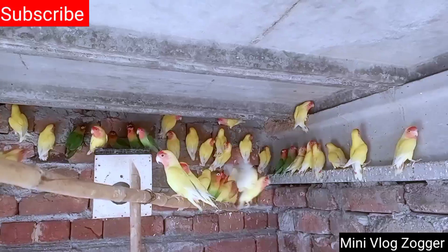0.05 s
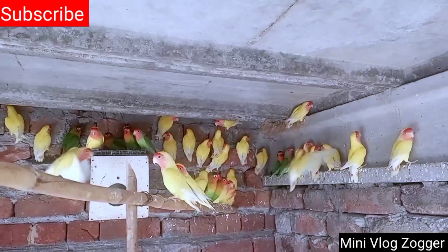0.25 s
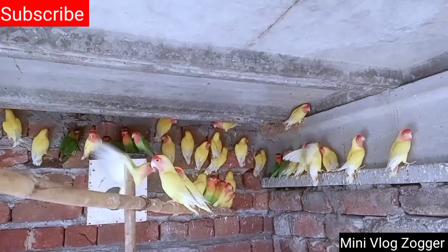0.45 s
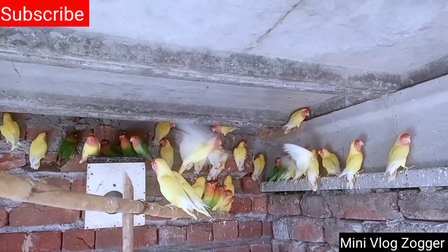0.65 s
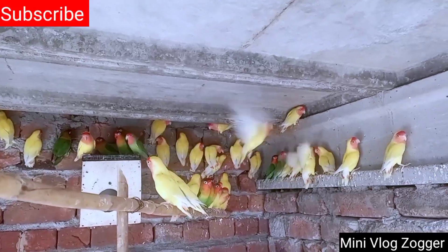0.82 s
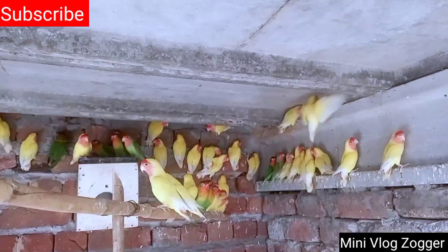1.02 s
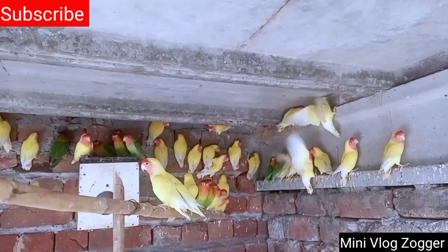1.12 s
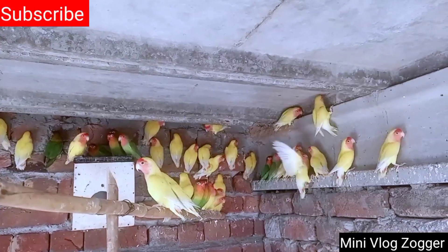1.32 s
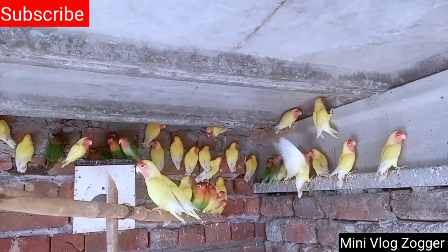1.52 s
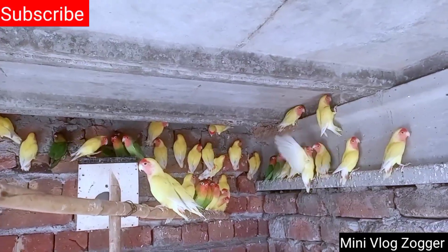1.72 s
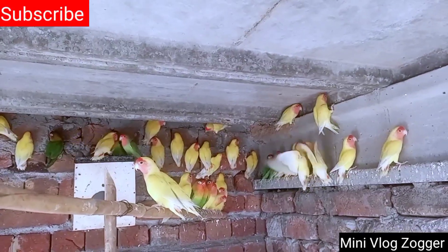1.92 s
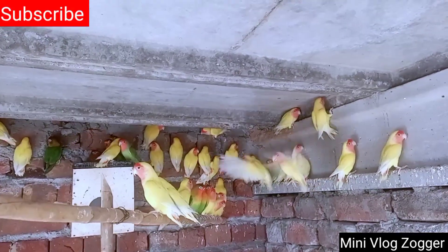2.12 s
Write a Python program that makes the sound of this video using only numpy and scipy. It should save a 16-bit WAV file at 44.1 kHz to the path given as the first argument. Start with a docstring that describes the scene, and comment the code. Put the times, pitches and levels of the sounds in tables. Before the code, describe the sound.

Near small parrots give rapid rasping squawks mixed with piercing whistles, pause briefly, then chirp in short bursts. Farther birds twitter behind, with barely audible wing puffs and faint rumble, in a small reflective enclosure.

```python
"""Small parrots in an aviary

A flock of small parrots chatters in a brick aviary under a concrete ceiling.
Near birds squawk and chirp: rough tones near 2 kHz, usually strongest in the second harmonic, plus rasp.
They also give short shrill whistles: gliding tones with a weak overtone.
Birds further off twitter between them, with soft low notes, as gliding tones and a blur of noise bands.
Two wing beats are puffs of low noise, and a faint rumble is shaped noise. All of it fades in.
"""
import sys
import numpy as np
from scipy import signal
from scipy.fft import rfft, irfft
from scipy.io import wavfile

SR = 44100
rng = np.random.default_rng(int(sys.argv[2]) if len(sys.argv) > 2 else 0)


def materialize(psi):
    """Save the field psi as 16-bit PCM at rate SR to the path in sys.argv[1].

    A 1-D psi becomes a single channel; in a 2-D psi each row is a channel.
    """
    bounded = np.clip(np.atleast_2d(psi).T, -1, 1)
    quanta = np.round(bounded * 32767).astype(np.int16)
    wavfile.write(sys.argv[1], SR, quanta)


N = 94815
TIME = np.arange(N) / SR


def from_db(db):
    """Turn decibels into a gain."""
    return 10 ** (np.asarray(db) / 20)


def rms_one(x):
    """Scale a signal to unit power."""
    return x / np.sqrt(np.mean(x ** 2) + 1e-20)


def coloured(x, spectrum):
    """Shape a signal by a smooth spectrum and scale it to unit power."""
    hz, db = np.transpose(spectrum)
    bins_hz = np.maximum(np.fft.rfftfreq(len(x), 1 / SR), 1)
    gain = from_db(np.interp(np.log(bins_hz), np.log(hz), db))
    return rms_one(irfft(rfft(x) * gain, len(x)))


def shake(rate, size=N):
    """Irregular wobble in two octaves around a rate, with unit spread and rounded extremes."""
    sos = signal.butter(3, [rate / 2, rate * 2], "band", fs=SR, output="sos")
    settle = SR // 4  # dropped, so that the filter has settled
    noise = signal.sosfilt(sos, rng.standard_normal(size + settle))[settle:]
    return rms_one(np.tanh(rms_one(noise) / 2))


def wobble(rate, size):
    """An irregular wobble for the length of one note."""
    return np.resize(shake(rate, size=SR // 4), size)


def patchy_noise(edges_hz, patch_db, rate):
    """Noise in bands that each swell and fade on their own."""
    out = np.zeros(N)
    for low, high in zip(edges_hz, edges_hz[1:]):
        sos = signal.butter(2, [low, high], "band", fs=SR, output="sos")
        band = signal.sosfilt(sos, rng.standard_normal(N))
        out += band * from_db(patch_db * shake(rate))
    return out


def treble_shelf(x, split_hz, db):
    """Raise or lower everything above a split by a level that may move."""
    low = signal.sosfiltfilt(signal.butter(3, split_hz, fs=SR, output="sos"), x)
    return low + (x - low) * from_db(db)


def gate(start, length, attack, release):
    """Sample positions of a note, and its rounded rise, hold and fall."""
    at = np.flatnonzero((TIME >= start) & (TIME < start + length))
    t = TIME[at] - start
    rise = np.sin(np.pi / 2 * np.clip(t / attack, 0, 1))
    fall = np.sin(np.pi / 2 * np.clip((length - t) / release, 0, 1))
    return at, rise * fall


RATTLE_PER_S = (175, 290)  # each note starts from its own rate in this range
RATTLE_DRIFT, RATTLE_DRIFT_PER_S = .16, 45  # the rate drifts by this share


def rattle(size):
    """The quick, almost regular beat of a rough voice, between -1 and 1."""
    rate = rng.uniform(*RATTLE_PER_S) * (1 + RATTLE_DRIFT * wobble(RATTLE_DRIFT_PER_S, size))
    return np.sin(2 * np.pi * (rng.random() + np.cumsum(rate) / SR))


# Irregular pitch movement, as a share of the pitch at roughness 1
JITTER, JITTER_PER_S = .028, 160
WANDER, WANDER_PER_S = .022, 60
FLUTTER_DB, FLUTTER_PER_S = 3, 105
HARMONIC_FLICKER_DB, FLICKER_PER_S = 3.2, 35


def syrinx(size, first_hz, last_hz, arch, swing, rough, harmonics_db):
    """A bird's voice organ: a gliding, unsteady tone with flickering harmonics, at unit power."""
    progress = np.linspace(0, 1, size)
    glide_hz = first_hz + (last_hz - first_hz) * progress
    bulge = arch * (np.sin(np.pi * progress) - 2 / np.pi)  # averages to zero
    shiver = JITTER * wobble(JITTER_PER_S, size) + WANDER * wobble(WANDER_PER_S, size)
    bend = bulge + rough * (swing + shiver)
    phase = 2 * np.pi * np.cumsum(glide_hz * (1 + bend)) / SR
    tone = np.zeros(size)
    for k, db in enumerate(harmonics_db, 1):
        # a harmonic at 0 dB holds steady
        flicker_db = HARMONIC_FLICKER_DB * (db != 0) * wobble(FLICKER_PER_S, size)
        tone += from_db(db + flicker_db) * np.sin(k * phase + rng.uniform(0, 2 * np.pi))
    return rms_one(tone * from_db(FLUTTER_DB * rough * wobble(FLUTTER_PER_S, size)))


ECHO_DELAYS_S, ECHO_GAIN = (.001, .011), .38  # nearby walls and ceiling


def add(out, at, note):
    """Place a note with a few close echoes of its own perch, keeping its energy."""
    path = np.zeros(SR // 50)
    path[(rng.uniform(*ECHO_DELAYS_S, size=4) * SR).astype(int)] = ECHO_GAIN
    path[0] = 1
    heard = signal.fftconvolve(note, path)
    heard *= np.sqrt(np.sum(note ** 2) / np.sum(heard ** 2))
    heard = heard[:N - at[0]]
    out[at[0]:at[0] + len(heard)] += heard


THROAT_LOW_HZ = 1990  # the small throat passes little below this


def throat(x, resonances):
    """The hollows and peaks of a small bird's throat, and its steep lower edge."""
    for hz, db, q in resonances:
        band = signal.lfilter(*signal.iirpeak(hz, q, fs=SR), x)
        x = x + (from_db(db) - 1) * band
    return signal.sosfilt(signal.butter(10, THROAT_LOW_HZ, "high", fs=SR, output="sos"), x)


# Throat colour of the rasp, before the beak and throat shape it
# columns: pitch_hz, relative level_db
RASP_COLOUR = [(1750, -22.5), (2050, -35), (2400, 3), (2800, 4), (3250, 2.5), (3900, 11), (5000, 5.5),
               (6000, -1), (7000, -5.5), (8400, -6), (10300, -11.5), (11900, -37.5), (13000, -18),
               (15500, -15)]
RASP_PATCH_DB = 6
SQUAWK_ATTACK_S, SQUAWK_RELEASE_S = 0.0082, 0.018
SQUAWK_ARCH = 0.024  # the pitch bulges by this share
VOICE_PULSE_DB, RASP_PULSE_DB = 4, 7  # level pulses with each beat; the voice's grow with roughness
# the beak opens and closes; the treble is weaker while it is shut
OPEN_S, CLOSE_S, CLOSED_DB, BEAK_SPLIT_HZ = 0.019, 0.024, -7, 3120


def rough_notes(notes, upper_harmonics, swing):
    """Rough notes whose pitch, level and rasp beat together, brightest with the beak wide open."""
    out = np.zeros(N)
    edges_hz = np.geomspace(1000, 16000, 32)
    rasp = coloured(patchy_noise(edges_hz, RASP_PATCH_DB, FLICKER_PER_S), RASP_COLOUR)
    for start, length, first_hz, last_hz, db, rough, rasp_db, low_db, third_db, treble_db in notes:
        at, envelope = gate(start, length, SQUAWK_ATTACK_S, SQUAWK_RELEASE_S)
        _, beak = gate(start, length, OPEN_S, CLOSE_S)
        size = len(at)
        beat = rattle(size)

        harmonics = [low_db, 0, third_db] + [h + treble_db for h in upper_harmonics]
        voice = syrinx(size, first_hz, last_hz, SQUAWK_ARCH, swing * beat, rough, harmonics)
        pulse = rms_one(np.gradient(beat))
        voice = rms_one(voice * from_db(VOICE_PULSE_DB * rough * pulse))

        rasp_pulse_db = RASP_PULSE_DB * beat + FLUTTER_DB * wobble(FLUTTER_PER_S, size)
        breath = rms_one(rasp[at] * from_db(rasp_pulse_db))
        note = rms_one(voice + from_db(rasp_db) * breath)
        note = treble_shelf(note, BEAK_SPLIT_HZ, CLOSED_DB * (1 - beak))
        add(out, at, from_db(db) * envelope * note)
    return out


WHISTLE_SWING = .05  # pitch swing of each beat, as a share at roughness 1
OVERTONE_DB = -25  # second harmonic against the first


def whistled(notes, attack, release):
    """Warbling notes with one weak overtone."""
    out = np.zeros(N)
    for start, length, first_hz, last_hz, db, rough in notes:
        at, envelope = gate(start, length, attack, release)
        swing = WHISTLE_SWING * rattle(len(at))
        tone = syrinx(len(at), first_hz, last_hz, 0, swing, rough, [0, OVERTONE_DB])
        add(out, at, from_db(db) * envelope * tone)
    return out


# Colour of the faint rumble
# columns: pitch_hz, relative level_db
RUMBLE_COLOUR = [(25, -11), (70, -5.5), (100, 3.5), (170, -3.5), (250, -8.5), (900, -14), (3000, -9),
                 (15000, -39)]
RUMBLE_DB = -76


def faint_rumble():
    """A steady rumble made of shaped noise."""
    return from_db(RUMBLE_DB) * coloured(rng.standard_normal(N), RUMBLE_COLOUR)


# Overall level of the distant flock, before its treble moves
# columns: time_s, level_db
FLOCK_LEVEL = [(.15, -39), (.78, -44.5), (.86, -42.5), (.93, -43), (1.12, -46), (1.19, -52), (1.25, -48),
               (1.355, -62), (1.39, -55.5), (1.50, -53), (1.555, -59.5), (1.62, -42), (1.72, -47.5),
               (1.785, -52.5), (1.90, -42), (2.03, -47), (2.08, -50), (2.15, -46.5)]
# Treble of the distant flock against its middle
# columns: time_s, treble_db
FLOCK_TREBLE = [(.15, -4), (.82, -15), (.9, -15.5), (1.18, -13), (1.249, -26), (1.344, -14), (1.372, 4),
                (1.5, 6), (1.62, -9), (1.79, -7.5), (2.03, -4.5), (2.15, -11)]
# Colour of the distant flock, before its treble moves
# columns: pitch_hz, relative level_db
FLOCK_COLOUR = [(600, -52), (1200, -35), (1900, -28.5), (2500, -8), (3400, -2), (4400, -9.5), (5800, -3.5),
                (7000, -13.5), (8000, -22.5), (10000, -28), (15500, -41)]
FLOCK_FLUTTER_DB, FLOCK_PATCH_DB, FLOCK_PATCH_PER_S = -0.5, 5, 10.7
FLOCK_SPLIT_HZ = 3300


def distant_flock():
    """Many far voices blur together; each pitch region swells and fades on its own."""
    edges_hz = np.geomspace(800, 16000, 20)
    voices = patchy_noise(edges_hz, FLOCK_PATCH_DB, FLOCK_PATCH_PER_S)
    voices = voices * from_db(FLOCK_FLUTTER_DB * shake(FLUTTER_PER_S / 2))
    level_db = np.interp(TIME, *np.transpose(FLOCK_LEVEL))
    treble_db = np.interp(TIME, *np.transpose(FLOCK_TREBLE))
    return from_db(level_db) * treble_shelf(coloured(voices, FLOCK_COLOUR), FLOCK_SPLIT_HZ, treble_db)


# Squawks of near birds; level_db is set before the envelope, beak and throat
# columns: start_s, length_s, first_pitch_hz, last_pitch_hz, level_db, roughness (0 smooth, 1 rough),
# rasp_db (against the voice), fundamental_db and third_harmonic_db (against the second harmonic),
# treble_db (added to harmonics 4 to 7)
SQUAWKS = [ (0.146, 0.17, 2048, 1946, -27, 0.71, -1, -44, -13, -2),
           (0.315, 0.11, 1747, 1704, -38.5, 1.23, -4.5, -45, -38, -15),
           (0.369, 0.082, 2224, 2112, -25, 0.7, -11.5, -51, -21, -4.5),
           (0.437, .122, 2158, 1939, -26, 0.73, -15, -36.5, -18, 0),
           (0.44, 0.096, 2434, 2620, -31, 0.54, 1, 1.5, -1, 4.5),
           (0.547, 0.07, 1860, 1842, -40.5, 0.9, -31, -29, -40, -32),
           (0.593, 0.016, 2240, 2245, -32.5, 0.37, -6, 8.5, 11, 17),
           (0.624, 0.086, 2137, 2026, -28, 0.62, -10, -30, -38, -5.5),
           (.686, 0.061, 1993, 1958, -26, 0.44, -7.5, -23.5, -25, -9),
           (0.914, 0.014, 2534, 2340, -32, 0.25, 0, 19, 12, 14),
           (0.925, 0.02, 2220, 2090, -27.5, 0.26, -2.5, -31, -19, 9.5),
           (0.949, 0.075, 2102, 2022, -23.5, 0.61, -21, -51, -32, -3.5),
           (1.017, 0.029, 2018, 1996, -28, 0.35, -23, -14, -8, -12),
           (1.001, 0.12, 2396, 2490, -33.5, 0.6, -1.5, -2.5, -19, -14),
           (1.076, 0.019, 2460, 2470, -30.5, 0.9, -5, -10, 11, 15),
           (1.11, 0.043, 2210, 2113, -27.5, 0.12, 2, -38, -25, -4), ]
# Harmonics 4 to 7 before treble_db is added
# one column: level_db (against the second harmonic)
SQUAWK_HARMONICS = [-12.5, -25.5, -18.5, -33]
# Hollows and peaks of the throat
# columns: pitch_hz, level_db, sharpness (Q)
SQUAWK_THROAT = [(3180, 1.5, 7.6), (5960, -6.5, 6), (13070, -10, 5.5)]
SQUAWK_SWING = .085  # pitch swing of each beat, as a share at roughness 1


def squawks():
    """Near birds' rasping squawks: beating rough notes coloured by the throat."""
    return throat(rough_notes(SQUAWKS, SQUAWK_HARMONICS, SQUAWK_SWING), SQUAWK_THROAT)


FAR_ATTACK_S, FAR_RELEASE_S = 0.0016, 0.0077
# Soft low notes; the direct sound is later halved
# columns: start_s, length_s, first_pitch_hz, last_pitch_hz, level_db, roughness (0 smooth, 1 rough)
LOW_NOTES = [ (.295, 0.066, 513, 442, -64.5, 0.38), (.555, 0.0245, 531.4, 492, -52.5, 0.12),
             (1.185, 0.18, 590, 567, -82, .2), (1.950, 0.056, 527, 510, -70, 0.32),
             (1.992, 0.06, 784, 707, -67.5, 0.54), ]


def low_notes():
    """Soft low notes: gliding tones that warble slightly."""
    return whistled(LOW_NOTES, FAR_ATTACK_S, FAR_RELEASE_S)


# Calls of birds further off; the direct sound is later halved
# columns: start_s, length_s, first_pitch_hz, last_pitch_hz, level_db, roughness (0 smooth, 1 rough)
FAR_CALLS = [ (.846, 0.062, 3372, 3440, -39.5, 0.67), (.30, 0.054, 1663, 1567, -65.5, 0.3),
             (1.215, 0.043, 4104, 3860, -49, 0.42), (1.250, 0.084, 3160, 3360, -50.5, 0.67),
             (1.525, 0.14, 1518, 1310, -68, 0.8), (1.565, 0.04, 3530, 3600, -51, 0.05),
             (1.595, 0.1, 2490, 2312, -51.5, 0.54), (1.745, 0.018, 3970, 3320, -51, 0.1),
             (1.790, 0.0073, 3630, 3330, -43, 0.3), (1.958, 0.091, 1613, 1410, -58.5, 0.48),
             (1.975, 0.068, 3020, 3380, -45, 1.17), (1.975, 0.064, 2954, 2764, -44.5, 0.15),
             (1.995, 0.067, 3980, 3660, -50.5, 0.1), (1.985, 0.057, 4670, 4390, -45, 0.48), ]


def far_calls():
    """Twittering birds further off: short gliding tones."""
    return whistled(FAR_CALLS, FAR_ATTACK_S, FAR_RELEASE_S)


# Wing beats that push puffs of air
# columns: start_s, length_s, level_db (before the envelope)
WING_BEATS = [(0.327, 0.044, -66), (1.354, 0.036, -79)]
# Colour of a puff
# columns: pitch_hz, relative level_db
PUFF_COLOUR = [(25, -8), (90, 0), (170, 1.5), (280, -8), (1000, -33), (4000, -54)]


def wings():
    """Soft low puffs of noise from birds that flap between perches."""
    out = np.zeros(N)
    air = coloured(rng.standard_normal(N), PUFF_COLOUR)
    for start, length, db in WING_BEATS:
        at, envelope = gate(start, length, length / 2, length / 2)
        out[at] += from_db(db) * envelope * rms_one(air[at])
    return out


# Whistles of near birds; level_db is set before the envelope
# columns: start_s, length_s, first_pitch_hz, last_pitch_hz, level_db, roughness (0 smooth, 1 rough)
WHISTLES = [ (.367, 0.037, 5490, 5540, -29.5, 0.26), (.612, 0.014, 4280, 4320, -20.5, 0),
            (.614, 0.066, 5407, 5510, -31.5, 0.66), (.692, 0.026, 7640, 7840, -45, 0.2),
            (.702, 0.045, 5500, 5920, -28, 0.49), (.748, 0.013, 5600, 5670, -44, .5),
            (.927, 0.038, 5777, 5850, -29.5, 0.49), (.940, 0.014, 9800, 9900, -38.5, 0.3),
            (1.080, 0.02, 4700, 4750, -28, 0.05), (1.087, 0.03, 6050, 5990, -26.5, 0.55),
            (1.120, 0.044, 6320, 6000, -43, 0.46), (1.426, 0.012, 3965, 3934, -27.5, 0.13),
            (1.645, 0.015, 3882, 4052, -24, 0), (1.699, 0.015, 5380, 5580, -29, 0.13),
            (1.814, 0.0083, 4340, 4820, -29, 0.3), (1.825, 0.03, 6070, 6190, -26, 0.56),
            (1.850, 0.015, 3924, 3985, -25.5, 0), (1.903, 0.022, 5930, 5780, -24, 0.42),
            (1.951, 0.023, 6020, 5950, -33, 0.32), ]
WHISTLE_ATTACK_S, WHISTLE_RELEASE_S = 0.0062, 0.0024


def whistles():
    """Near birds' short shrill whistles: high gliding tones that end sharply."""
    return whistled(WHISTLES, WHISTLE_ATTACK_S, WHISTLE_RELEASE_S)


# Chirps of near birds; level_db is set before the envelope, beak and throat
# columns: start_s, length_s, first_pitch_hz, last_pitch_hz, level_db, roughness (0 smooth, 1 rough),
# rasp_db (against the voice), fundamental_db and third_harmonic_db (against the second harmonic),
# treble_db (added to harmonics 4 to 7)
CHIRPS = [ (1.433, 0.0567, 2143, 2021, -32, 0.5, -31, -5, -6.5, 1),
          (1.477, 0.025, 2070, 2210, -30, 0.85, -29, -20.5, -21, -2),
          (1.656, 0.063, 2045, 2252, -26.5, 0.48, -12.5, -14, -7.5, -0.5),
          (1.811, 0.028, 2060, 2004, -31.5, 0.83, -15, -17.5, -14, 1.5),
          (1.864, 0.05, 2132, 2225, -26, 0.57, -37, -23, -6.5, -1.5),
          (1.899, 0.036, 2246, 2035, -41.5, 0.67, -31, -13, -31, 10),
          (1.941, 0.025, 2073, 1914, -27, 0.38, -5.5, 1.5, 6, 10), ]
# Harmonics 4 to 7 before treble_db is added
# one column: level_db (against the second harmonic)
CHIRP_HARMONICS = [-12.5, -13, -26, -20.5]
# Hollows and peaks of the throat
# columns: pitch_hz, level_db, sharpness (Q)
CHIRP_THROAT = [(2360, -16, 5.3), (3550, -16, 8), (5280, 6.5, 8.1), (11270, -26, 4.4)]
CHIRP_SWING = .12  # pitch swing of each beat, as a share at roughness 1


def chirps():
    """Near birds' chirps: like squawks, but mostly with less rasp, a wider swing and another throat."""
    return throat(rough_notes(CHIRPS, CHIRP_HARMONICS, CHIRP_SWING), CHIRP_THROAT)


ROOM_T60_S, ROOM_DELAY_S, WALL_CUT_HZ = 0.15, 0.001, 7100
ROOM_DB, FAR_ROOM_DB = -13, -4.5  # how strongly near and far birds feed the room


def aviary(x):
    """Dense, slightly dull reflections from brick and concrete that die quickly."""
    t = TIME[:SR // 2]
    decay = from_db(-60 * t / ROOM_T60_S)
    tail = rng.standard_normal(len(t)) * decay * (t > ROOM_DELAY_S)
    tail = signal.sosfilt(signal.butter(2, WALL_CUT_HZ, fs=SR, output="sos"), tail)
    # bring the average gain below about 5.5 kHz to one
    tail /= np.abs(rfft(tail))[:len(t) // 8].mean()
    return signal.fftconvolve(x, tail)[:N]


def scene():
    """Near and far birds in the room, with wing beats, over a faint rumble."""
    background = faint_rumble() + distant_flock()
    near = squawks() + whistles() + chirps()
    far = low_notes() + far_calls()
    room = aviary(from_db(ROOM_DB) * near + from_db(FAR_ROOM_DB) * far)
    return (near + far / 2 + room + background + wings())[None]


FADE_START_S, FADE_S = 0.14, 0.11
CUTOFF_HZ = 15650


def record(dry):
    """Fade the sound in from silence and cut the top steeply."""
    fade = np.clip((TIME - FADE_START_S) / FADE_S, 0, 1) ** 1.79
    top_cut = signal.ellip(12, .1, 80, CUTOFF_HZ, fs=SR, output="sos")
    return signal.sosfilt(top_cut, dry * fade)


dry = scene()
out = record(dry)
materialize(out)
```